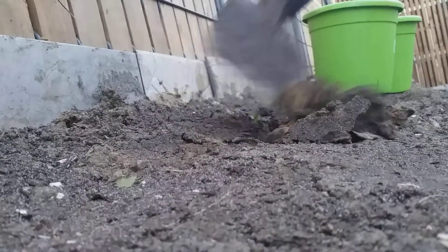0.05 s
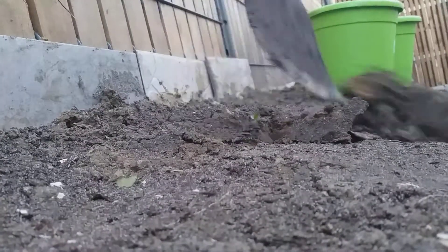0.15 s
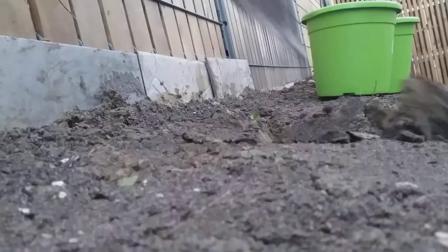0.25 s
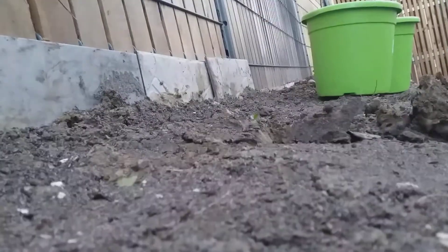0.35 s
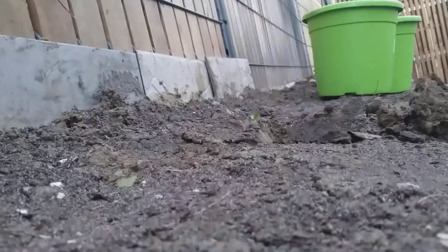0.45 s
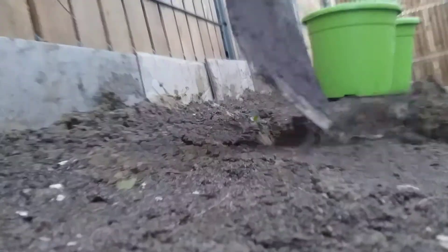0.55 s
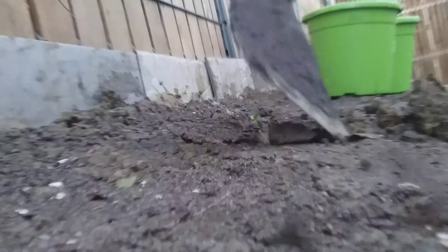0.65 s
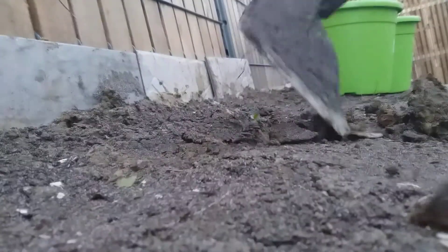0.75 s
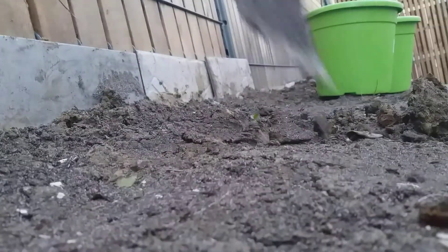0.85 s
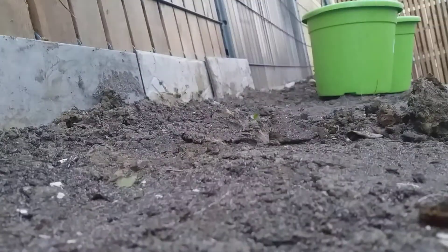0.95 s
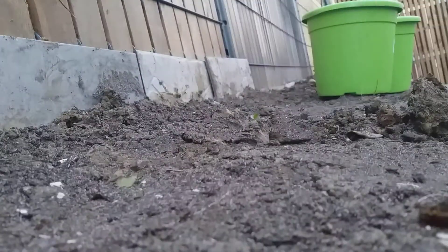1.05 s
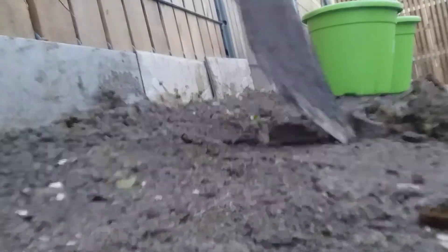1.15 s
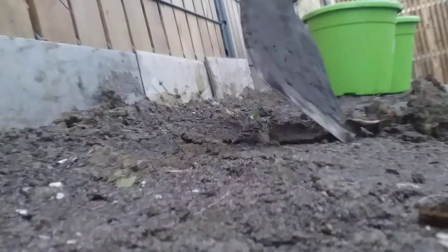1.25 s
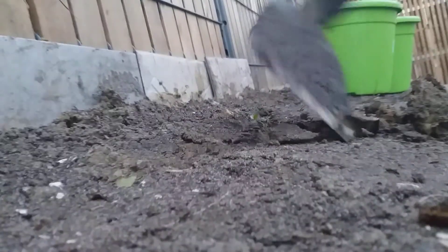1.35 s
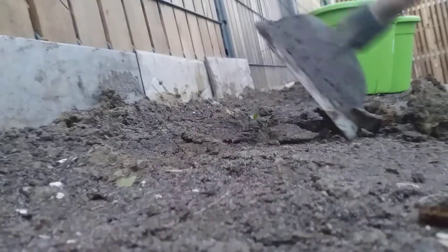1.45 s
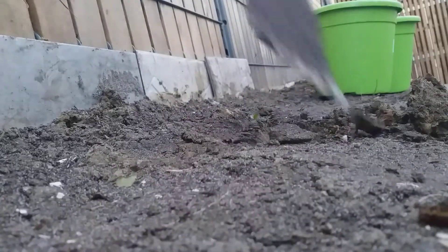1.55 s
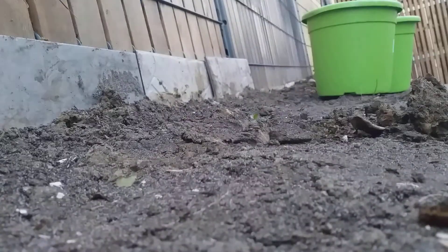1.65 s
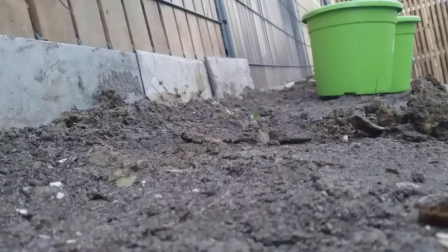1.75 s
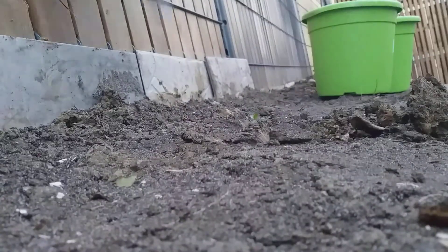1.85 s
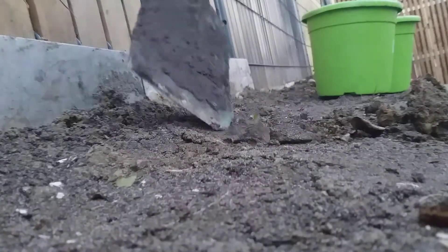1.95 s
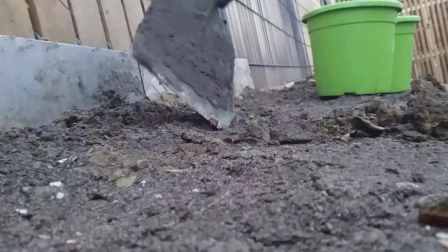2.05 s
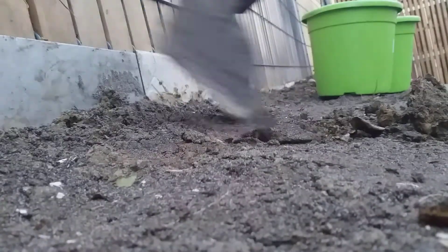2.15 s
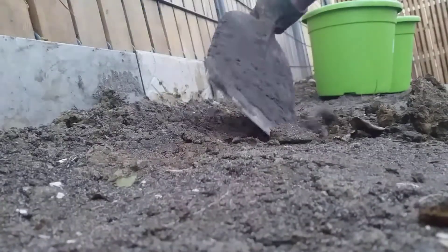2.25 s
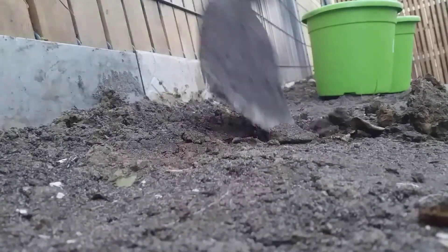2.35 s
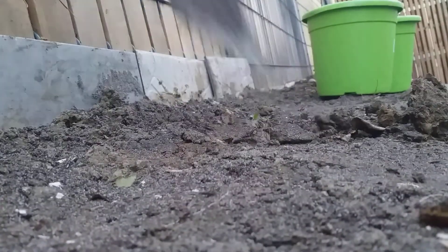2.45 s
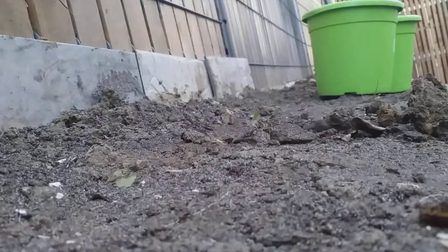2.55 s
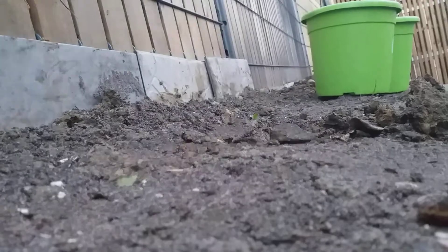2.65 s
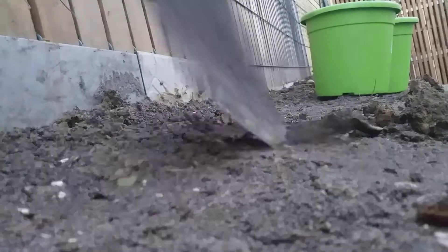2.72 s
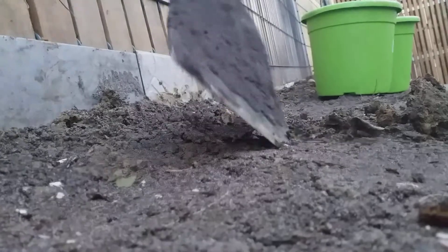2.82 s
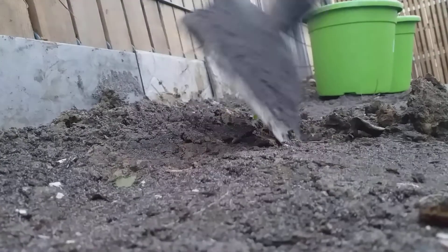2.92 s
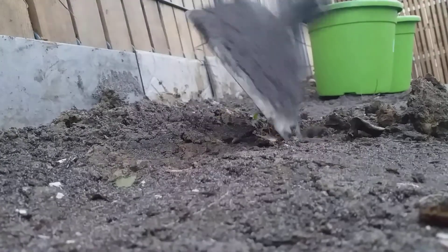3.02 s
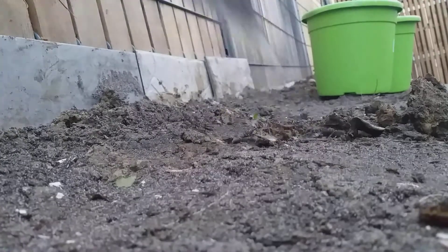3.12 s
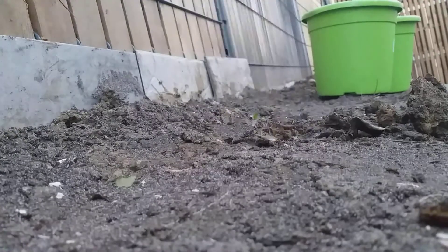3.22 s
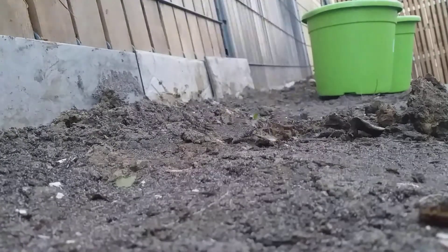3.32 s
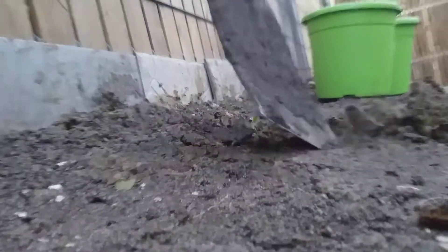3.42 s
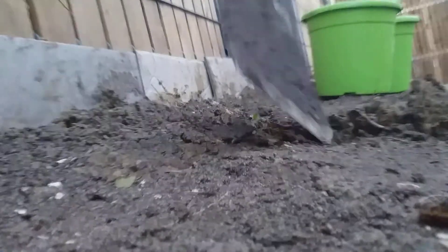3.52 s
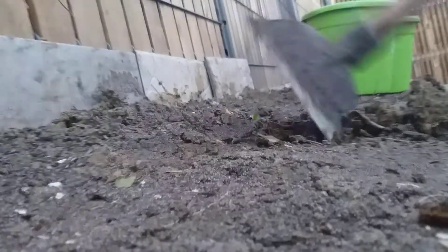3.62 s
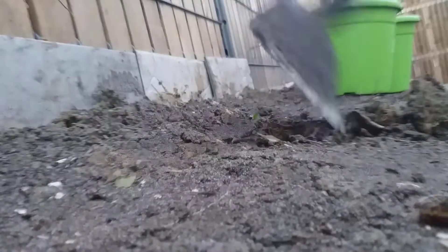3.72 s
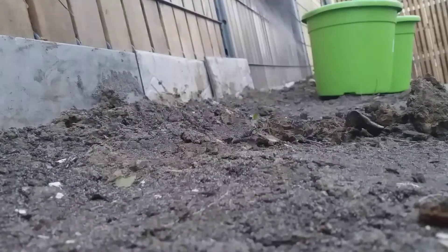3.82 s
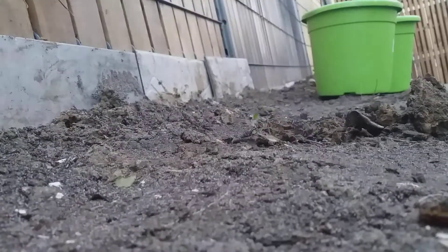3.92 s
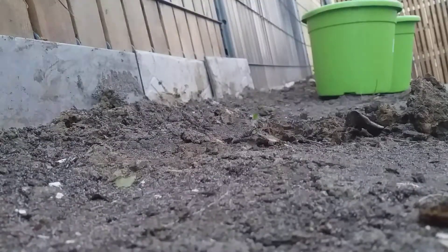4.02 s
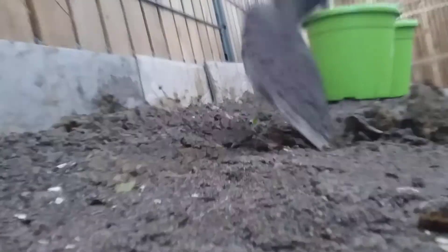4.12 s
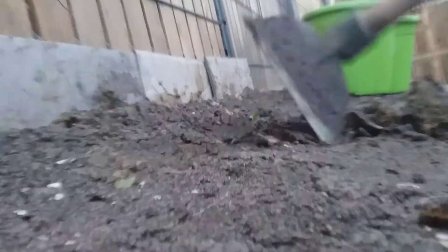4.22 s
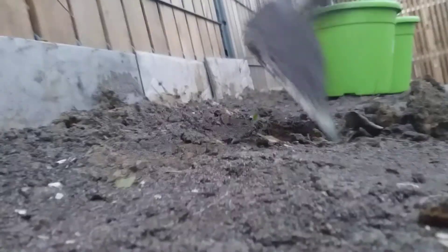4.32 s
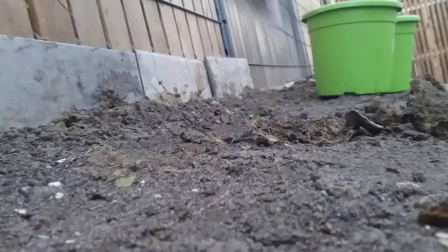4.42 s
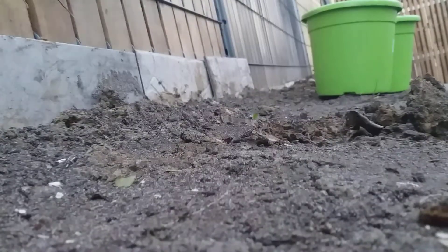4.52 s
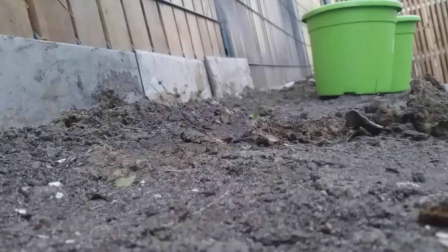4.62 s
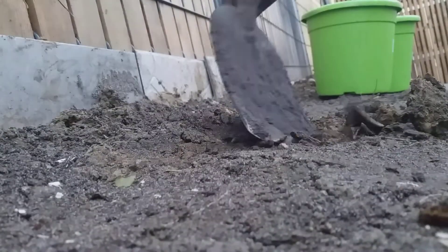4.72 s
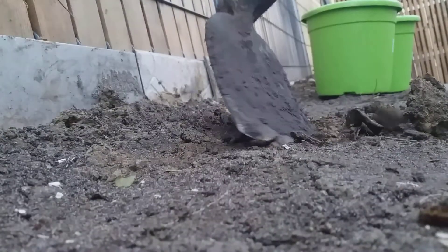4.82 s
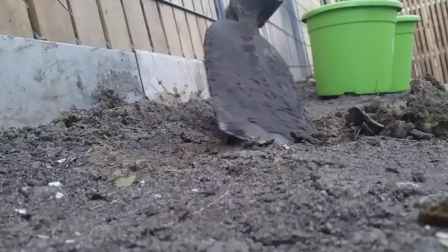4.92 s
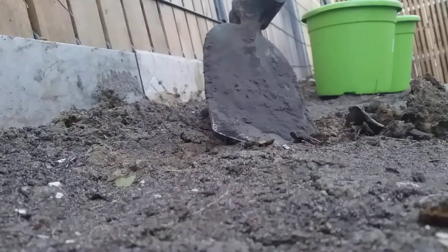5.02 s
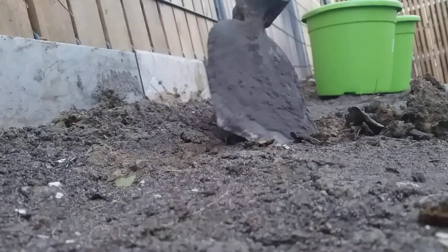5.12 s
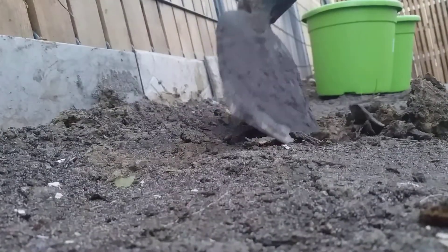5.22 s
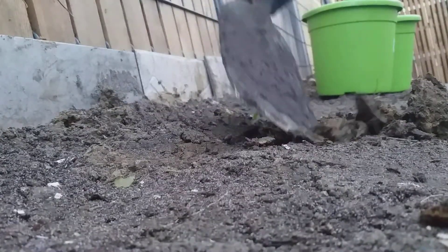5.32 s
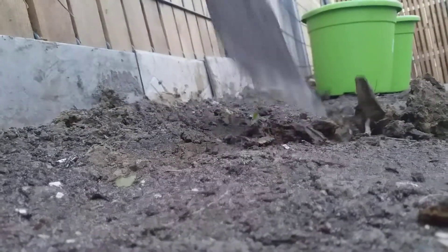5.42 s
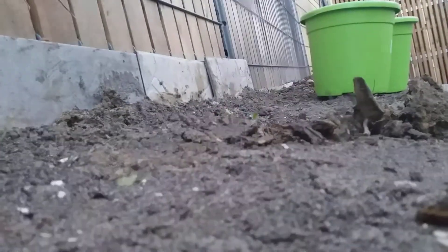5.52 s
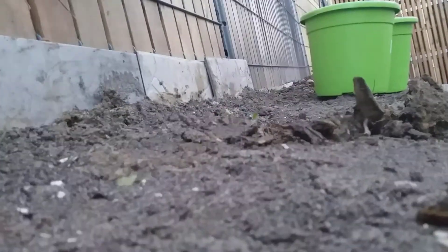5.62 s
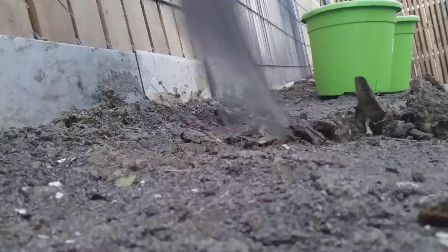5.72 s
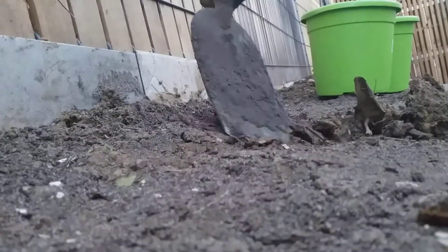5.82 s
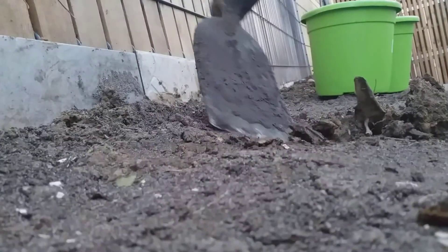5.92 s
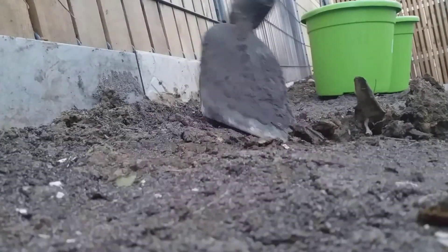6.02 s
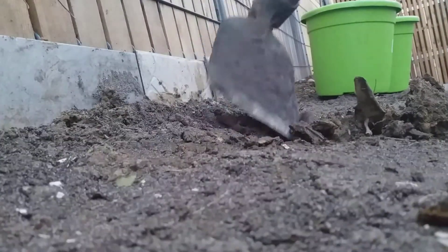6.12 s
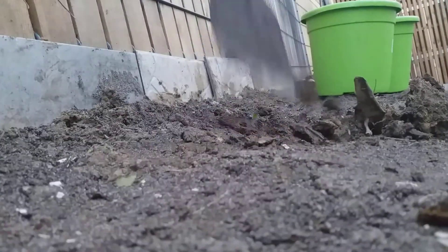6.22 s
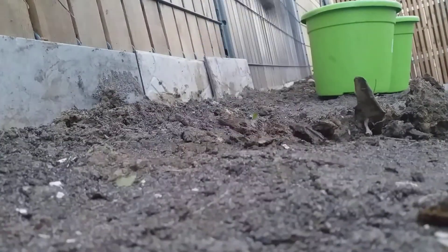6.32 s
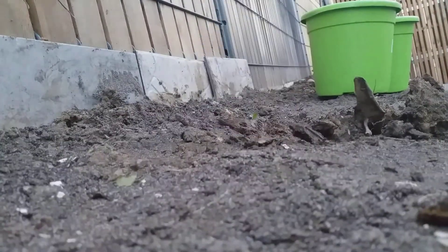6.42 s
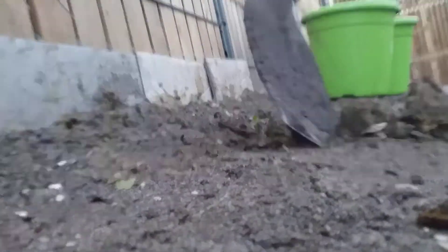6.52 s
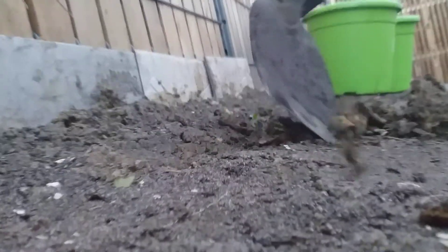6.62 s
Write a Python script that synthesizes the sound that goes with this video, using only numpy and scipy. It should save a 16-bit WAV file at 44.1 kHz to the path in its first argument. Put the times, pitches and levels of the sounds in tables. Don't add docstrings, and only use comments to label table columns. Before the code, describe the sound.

A steel hoe chops stony packed soil close by, each blow a sharp gritty crack over a dull earthy thud, with scrapes and falling crumbs between.

```python
import sys
import numpy as np
from scipy import signal
from scipy.fft import rfft, irfft
from scipy.io import wavfile
from scipy.ndimage import uniform_filter1d

SR = 44100
rng = np.random.default_rng(int(sys.argv[2]) if len(sys.argv) > 2 else 0)


def level_to_linear(level):
    exponent = np.asarray(level, float) / 20
    return 10 ** exponent


def store_pcm(level_fs):
    pcm = np.round(np.clip(level_fs, -1, 1) * 32767).astype(np.int16)
    wavfile.write(sys.argv[1], SR, np.atleast_2d(pcm).T)


N = 293706
T = np.arange(N) / SR

# time_s, level_db
TRAFFIC = [(0, -73), (.4, -77), (.7, -67), (1.7, -72.5), (2.1, -68.5), (2.7, -56.5), (3.3, -57.5),
           (3.8, -65.5), (4.3, -61), (4.6, -76), (5.3, -70.5), (5.7, -71), (6, -72.5), (6.45, -72.5),
           (6.66, -58.5)]
# frequency_hz, density_db_per_hz
TOWN_SPECTRUM = [(18, -38), (30, -17.5), (91, -2), (180, -5), (367, -6.5), (453, -2), (606, -5.5),
                 (656, -5.5), (729, -6.5), (1690, -19.5), (6170, -17), (8240, -37.5), (16400, -24)]

# frequency_hz, density_db_per_hz
GRIT_SPECTRUM = [(150, -41), (900, -21), (1750, -18), (2500, -9), (3600, -7), (4500, -5), (5500, -5),
                 (6350, -4.5), (6850, 0.5), (7560, -10.5), (8400, -23.5), (9500, -25), (11200, -20.5),
                 (15800, -20)]
# peak_s, level_db, brightest_hz
PEBBLES = [
    (.0695, -43.5, 3070),
    (.7079, -41.5, 2160),
    (.8803, -55, 2090),
    (.9184, -49.5, 6900),
    (.9712, -54.5, 3714),
    (1.012, -57.5, 6900),
    (1.1145, -47.5, 3300),
    (2.53, -48, 4270),
    (5.9525, -38.5, 2645),
    (.266, -54, 6500),
]
# peak_s, level_db, brightest_hz, rise_ms, fall_ms
SKIDS = [(.0945, -39.5, 4480, 2.1, 12.6), (2.3522, -28, 6000, 6.2, 3.1), (2.3614, -30.5, 3400, 3.3, 3.2),
         (2.8741, -29.5, 6630, 5, 4), (2.9037, -30, 4450, 0.6, 5.1), (3.0176, -29, 5630, 4.8, 7.9),
         (3.0248, -22.5, 7400, 19, 6.4), (4.6744, -4.5, 6490, 1.2, 5.7), (4.9078, -22, 5930, 2.1, 3),
         (4.9139, -18, 6200, 1.7, 2), (5.0317, -33.5, 3560, 0.74, 2.25), (5.3126, -33, 5550, 1, 6.1),
         (5.3275, -32, 5360, 1.5, 3), (5.3615, -27, 5660, 3, 3), (5.3748, -23, 5000, 6, 6.8),
         (5.387, -22.5, 6600, 1.8, 1.7), (5.3992, -31.5, 4560, 4.6, 2.9), (5.9011, -30.5, 4400, 1.3, 5.6),
         (6.169, -22.5, 6060, 4.7, 7.5)]
# peak_s, level_db, brightest_hz, rise_ms, fall_ms
BITES = [(.1035, -24.5, 5800, 2, 2.3), (.544, -16.5, 4300, 2.6, 2.7), (1.1587, -6.5, 6300, 1.01, 1.64),
         (1.9121, -23, 6100, 1.08, 5.9), (2.2069, -22, 7160, 0.32, 5.7), (2.8182, -16.5, 6520, 0.28, 1.5),
         (4.0925, -3.5, 6340, 1.4, 3.5), (5.7477, -6, 6380, 1.5, 6.16), (6.512, -20.5, 6120, 2.43, 4.2),
         (6.5151, -9.5, 6400, 0.99, 6.9)]
# peak_s, level_db, brightest_hz, spread_ms
GRINDS = [(0.1391, -44.5, 5650, 4.3), (1.2404, -37, 5510, 3.8), (1.279, -38.5, 6200, 4.6),
          (1.4334, -44.5, 4130, 6.7), (1.5256, -46, 2500, 5), (2.1299, -46, 5760, 5),
          (2.8944, -38.5, 6110, 4.8), (2.9416, -39.5, 5980, 8.1), (3.0501, -29.5, 5800, 11),
          (3.0688, -31, 3940, 5.1), (3.4749, -26, 6300, 6.6), (3.4997, -31.5, 6000, 3.5),
          (3.539, -33, 4630, 4.6), (3.621, -37.5, 4440, 9.8), (4.275, -32, 5530, 5.8),
          (4.3299, -37.5, 6200, 3.7), (4.7302, -39, 6500, 10.5), (4.7507, -40.5, 6950, 5),
          (6.603, -31, 5930, 2.9), (6.6157, -32.5, 6200, 2.5)]
# peak_s, level_db, brightest_hz, rise_ms, fall_ms
BURIALS = [(.5504, -7, 3800, 1.74, 2.5), (1.168, -7.5, 5440, 3, 2.9), (1.9205, -26.5, 5200, 2.1, 4.33),
           (2.7325, -24, 4500, 0.92, 2), (2.7375, -11, 6550, 1.5, 2.2), (2.7415, -10.5, 6390, 2.5, 4),
           (3.42, -4, 6530, 2.44, 4.3), (3.4351, -22.5, 4470, 1.5, 3.3), (3.4419, -11, 4250, 2.3, 2.2),
           (3.513, -20, 6550, 2.6, 3.7), (4.6835, -13, 5590, 2.3, 3.1), (6.5234, -5, 4130, 1.5, 2.4)]
# peak_s, level_db, brightest_hz, fall_ms
SCORES = [(1.9, -40, 5800, 4), (1.9, -42, 5800, 5.8), (1.951, -39, 5300, 3.4), (2.2675, -42, 3500, 7.1),
          (2.3445, -37, 3620, 4.8), (2.8635, -39.5, 6100, 2), (2.9385, -38.5, 6100, 5.3),
          (2.956, -41.5, 4600, 8.1), (3.0905, -45, 10400, 2.7), (5.300, -46, 5300, 5),
          (5.3225, -40, 5400, 3), (5.8, -37, 5500, 3.6), (5.3715, -24, 6200, 2), (1.9425, -38.5, 3500, 5.6),
          (1.9165, -25, 5400, 1.7), (2.8075, -41, 4500, 2), (5.2, -35.5, 6460, 6), (4.1875, -42, 6600, 6),
          (4.7, -36, 7200, 5), (5.262, -47, 3500, 6.4), (6.565, -33, 5500, 3), (1.2095, -38, 5460, 3),
          (.569, -35, 4600, 3), (.6225, -40, 5200, 3)]
# peak_s, level_db, brightest_hz
SNAPS = [(2.1203, -35, 3600), (2.7814, -29.5, 4450), (2.8365, -42, 6500), (2.8807, -28, 4840),
         (3.4934, -30, 6330), (4.8245, -36.5, 5720), (4.8388, -28, 6400), (4.847, -36, 4990),
         (4.8525, -34.5, 6580), (4.8822, -27.5, 6460), (5.0116, -37, 5900), (5.05, -50, 5160),
         (5.1425, -47, 3840), (5.3063, -42, 5430), (5.8082, -28.5, 5100), (5.8773, -32, 4400),
         (6.189, -24.5, 4800), (6.5421, -32, 2960), (6.6247, -29.5, 8100)]
SNAP_RISE_MS, SNAP_FALL_MS, PEBBLE_RISE_MS, PEBBLE_FALL_MS = 0.67, 2.8, 0.79, 2.4
BITE_DULL_DB, BURIAL_DULL_DB, SKID_DULL_DB, SCORE_DULL_DB = -20, -13.5, -36.5, -26.5
GRIND_DULL_DB, SNAP_DULL_DB, PEBBLE_DULL_DB = -16.5, -20, -11
AIR_DB, AIR_PER_DB, AIR_AT_DB = -7, .15, -25

# peak_s, level_db, swell_db_per_s, fade_db_per_s
TUGS = [
    (0.097, -52.5, 91, 83),
    (1.525, -53.5, 98, 801),
    (2.144, -49.5, 125, 700),
    (2.19, -54, 100, 500),
    (2.351, -42, 600, 410),
    (3.046, -42.5, 168, 219),
    (3.919, -50, 632, 132),
    (5.25, -55, 85.5, 200),
    (5.381, -45.5, 314, 281),
    (6.183, -41, 204, 505),
]
# start_s, length_s, level_db, fade_db_per_s
POURS = [(0.55, .15, -38.5, 142), (0.664, .09, -52.5, 16), (0.745, 0.06, -50, -30), (0.84, .3, -67.5, 44),
         (1.177, .3, -41, 73), (1.926, .03, -46, 20), (1.96, .16, -53, 100), (2.209, 0.027, -42, 60),
         (1.493, .033, -54, 0), (2.26, 0.018, -50.5, 40), (2.392, 0.51, -64, 37.5), (2.756, .26, -48, 12.5),
         (3.1, 0.29, -64.5, 20.5), (3.432, .14, -30, 114), (3.568, 0.14, -47.5, 9),
         (4.097, 0.076, -48.5, -83.5), (4.182, 0.12, -40.5, 53), (4.357, .25, -66.5, 134),
         (4.701, .12, -50, 29), (4.799, .125, -57, -108), (4.92, .1, -47, 40), (5.03, .1, -62, 50),
         (5.467, 0.39, -71, 39.5), (5.753, 0.11, -46, 31), (5.87, 0.047, -44.5, 0), (5.887, .18, -46, 84),
         (6.214, .3, -56, 163), (6.538, .15, -38.5, 102)]
POUR_START_DB_S, POUR_STOP_DB_S, STILL_DB = 1701, 376, -88
CRACKLE_PER_S, CRACKLE_MS, CRACKLE_DB = 30, .9, -15
PATCH_DB = 3.6
FINE_FLICKER_DB, FINE_TILT, FINE_AT_DB = 2, 0.071, -51

# frequency_hz, level_db, t60_s
BLADE = [(520, -6, .08), (785, -4, .08), (1165, -8, .06), (1464, -6, .17), (1540, -2, .06), (2406, 0, .13),
         (2960, -12, .05), (3214, 0, .11), (3625, -6, .06), (4425, -5, .05), (4980, -12, .04),
         (5400, -13, .04), (6120, -3, .06), (6465, -6, .035), (6900, -15, .035), (7490, -18, .05)]
# frequency_hz, width_hz, level_db
SHEEN = [(8490, 46, -4.5), (9520, 160, -7), (10730, 73, -4), (11650, 74, -2.5), (12600, 130, -2.5),
         (13500, 72, -1), (13600, 97, 0.5), (14400, 130, -5), (15300, 69, -3.5), (15800, 120, -3.5)]
SHEEN_T60_S, SHEEN_DB, SHEEN_GRIPPED_DB = .016, 5, -20.5
BURIED_T60_SHARE, BURIED_DB, LOW_BURIED_DB = 0.24, -12, -16
GRIPPED_DB, RUBBED_DB, THIN_DB = -31.5, -23, 3
# release_s, main_mode_db, low_modes_db, middle_modes_db, upper_modes_gain_db
JERKS = [(.145, -50, -49, -50, -4.5), (1.525, -39, -46, -71.5, -11), (2.21, -48, -63, -54, -8),
         (4.276, -45, -63.5, -64, -8.5), (5.328, -50, -61, -58.5, -14), (2.133, -54, -51.5, -56.5, -5),
         (2.365, -47.5, -45, -37.5, -10.5), (3.068, -35, -40, -43, 0), (5.4, -50.5, -51, -47, -6.5),
         (6.19, -52, -52, -50, -8), (6.172, -43, -45, -54, -6.5)]
# release_s, main_mode_db, low_modes_db, middle_modes_db, upper_modes_gain_db
EASINGS = [
    (0.808, -56, -58, -76, -8),
    (3.715, -44.5, -52.5, -68.5, -14.5),
    (4.326, -46.5, -53.5, -48, -10.5),
]
JERK_S, EASE_S, RUB_DB = .02, .095, -7

# start_s, peak_db, pitch_hz, length_s, handle_knock_db
THUDS = [(0.101, -51, 113, 0.057, -37.5), (.546, -15.5, 110, 0.022, -25.5),
         (1.164, -20.5, 105, 0.041, -25.5), (1.513, -78, 123.8, 0.041, -44.5),
         (1.917, -33.5, 121, 0.033, -36), (2.204, -41, 118, 0.037, -44), (2.738, -23.5, 109, 0.041, -19),
         (3.026, -60, 98.3, 0.033, -40), (3.419, -11, 80.3, 0.049, -16), (3.435, -25.5, 68, 0.044, -15.5),
         (4.089, -23.5, 110.5, 0.04, -26), (4.67, -28, 117, 0.034, -38), (5.365, -68, 124, .04, -62),
         (5.748, -35.5, 94.5, 0.045, -47.5), (6.182, -54, 116, 0.061, -43), (6.518, -28, 87.7, 0.049, -21)]
THUD_LAG_S, THUD_RISE_S, SHUDDER_DB, SHUDDER_T60_S = .006, .004, -15, .14
# frequency_hz, level_db, t60_s
HANDLE = [(247, -1, 0.11), (525, 0.5, 0.015), (743.7, 5, 0.088)]
# start_s, level_db, pitch_hz, t60_s, pot_ring_db
CLODS = [(0.548, -17, 1120, 0.022, -90), (.695, -21, 870, 0.003, -63), (.707, -25, 850, 0.0083, -82),
         (.826, -28, 410, 0.0074, -83), (.87, -48, 1510, 0.011, -71), (.949, -43, 1520, 0.015, -57.5),
         (1.113, -39, 1490, 0.013, -48), (5.2, -47.5, 551, 0.18, -73), (5.25, -55, 527, 0.16, -65),
         (5.515, -52, 559, 0.18, -75), (5.555, -49, 453, 0.12, -68.5)]
# frequency_hz, level_db, t60_s
POT = [(546, 1.5, 0.22), (760, -9, 0.076), (1120, -8, 0.041), (1945, -11.5, 0.05), (3800, -16, 0.037)]
# time_s, level_db
SCUFF = [
    (3.84, -89),
    (3.86, -52),
    (3.925, -40.5),
    (3.95, -49.5),
    (4.0, -43.5),
    (4.05, -57),
    (4.08, -68),
]
FENCE_T60_S, FENCE_DB = 0.021, -24


def curve(table):
    s, *columns = np.transpose(table)
    return [np.interp(T, s, c) for c in columns]


def unit(x):
    return x / np.sqrt(np.mean(x ** 2))


def band(x, lo_hz, hi_hz, order=2):
    return signal.sosfilt(signal.butter(order, [lo_hz, hi_hz], "band", fs=SR, output="sos"), x)


def colour(x, points):
    hz, db = np.transpose(points)
    grid_hz = np.arange(1025) * SR / 2048
    log_gain = np.interp(np.log(grid_hz + 1), np.log(hz), db) * np.log(10) / 20
    cepstrum = irfft(log_gain)
    cepstrum[1:1024] *= 2
    cepstrum[1025:] = 0
    response = irfft(np.exp(rfft(cepstrum)))
    return signal.fftconvolve(x, response)[:len(x)]


def modes(x, table, t60_share=1):
    out = 0
    for hz, db, t60 in table:
        r = np.exp(-np.log(1000) / (t60 * t60_share * SR))
        pole = r * np.exp(2j * np.pi * hz / SR)
        out = out + level_to_linear(db) * np.sqrt(1 - r * r) * signal.lfilter([1], [1, -pole], x).imag
    return out


def walk(rate):
    k = int(SR / rate)
    held = np.repeat(rng.standard_normal(N // k + 1), k)
    return 1.2 * uniform_filter1d(uniform_filter1d(held, k), k)[:N]


def grains(shape, share, spread_db):
    u = rng.random((3,) + shape)
    size = level_to_linear(-spread_db * np.log(1 - .97 * u[2]))
    return unit((u[0] < share) * np.sign(u[1] - .5) * size)


def add(bus, s, x):
    i = max(int(s * SR), 0)
    bus[i:i + len(x)] += x[:N - i]


def town():
    noise = colour(rng.standard_normal(N), TOWN_SPECTRUM)
    noise /= np.std(band(noise, 150, 1200))
    swell = band(noise, 52, 1200) * level_to_linear(curve(TRAFFIC)[0] + 1.3 * walk(6))
    still = colour(rng.standard_normal(N), TOWN_SPECTRUM)
    return swell + level_to_linear(-74.0 + 1.0 * walk(4.1)) * unit(still)


def stones():
    rows = [r + (BITE_DULL_DB,) for r in BITES]
    rows += [r + (BURIAL_DULL_DB,) for r in BURIALS]
    rows += [r + (SKID_DULL_DB,) for r in SKIDS]
    rows += [r[:3] + (SNAP_RISE_MS / 2, r[3], SCORE_DULL_DB) for r in SCORES]
    rows += [r + (r[-1], GRIND_DULL_DB) for r in GRINDS]
    rows += [r + (SNAP_RISE_MS, SNAP_FALL_MS, SNAP_DULL_DB) for r in SNAPS]
    return rows + [r + (PEBBLE_RISE_MS, PEBBLE_FALL_MS, PEBBLE_DULL_DB) for r in PEBBLES]


def cracks():
    ms = np.arange(-512, 2560) / SR * 1000
    rows = stones()
    chips = colour(grains((len(rows) * len(ms),), .2, 2.5), GRIT_SPECTRUM).reshape(len(rows), -1)
    lumps = unit(band(rng.standard_normal(chips.shape), 220, 2200))
    sharp, dull = np.zeros((2, N))
    for (s, db, hz, rise_ms, fall_ms, dull_db), chip, lump in zip(rows, chips, lumps):
        swell = (np.abs(ms) / rise_ms) ** 1.8
        decay = (np.abs(ms) / fall_ms) ** 1.31
        shape = level_to_linear(-8 * np.where(ms < 0, swell, decay))
        tone = unit(chip) + 1.3 * unit(band(chip, .84 * hz, 1.14 * hz, order=1))
        tone = tone + level_to_linear(AIR_DB - AIR_PER_DB * (db - AIR_AT_DB)) * band(tone, 8000, 20000)
        burst = shape * tone / np.sqrt(np.sum((shape * tone) ** 2) / np.sum(shape ** 2))
        start_s = s + ms[0] / 1000
        add(sharp, start_s, burst * level_to_linear(db))
        add(dull, start_s, shape ** 0.54 * lump * level_to_linear(db + dull_db))
    return sharp, dull


def drag():
    db = np.full(N, 1. * STILL_DB)
    for s, length, top_db, fade in POURS:
        late = T - s
        run = top_db - fade * np.clip(late, 0, length) - POUR_STOP_DB_S * np.maximum(late - length, 0)
        db = np.maximum(db, run + POUR_START_DB_S * np.minimum(late, 0))
    for s, top_db, swell, fade in TUGS:
        db = np.maximum(db, top_db - np.where(T < s, swell, fade) * np.abs(T - s))
    u = rng.random((2, N))
    lumps = (u[0] < CRACKLE_PER_S / SR) * level_to_linear(CRACKLE_DB - 4 * np.log(1 - .95 * u[1]))
    bursts = signal.lfilter([1], [1, -np.exp(-1000 / (CRACKLE_MS * SR))], lumps)
    return level_to_linear(db) * (1 + bursts)


def patchy(x, depth_db):
    edges = 600 * 2 ** np.arange(0, 4.9, .25)
    return x + sum((level_to_linear(depth_db * walk(70)) - 1) * band(x, lo, hi) for lo, hi in zip(edges, edges[1:]))


def sliding_soil(flow):
    crumbs = grains((N,), .03, 3.0) + .6 * rng.standard_normal(N)
    slide = flow * unit(patchy(colour(crumbs, GRIT_SPECTRUM), PATCH_DB))
    fine = level_to_linear(FINE_FLICKER_DB * walk(160)) * (level_to_linear(FINE_AT_DB) / flow) ** FINE_TILT
    return slide + (fine - 1) * band(slide, 6600, 18000)


def releases():
    return [row + (JERK_S,) for row in JERKS] + [row + (EASE_S,) for row in EASINGS]


def freedom(column):
    gain = 0
    for row in releases():
        loosening = np.maximum(np.exp(-np.abs(row[0] - T) / row[5]) - .1, 0)
        gain = gain + level_to_linear(row[column]) * (row[0] > T) * loosening
    return gain


def ring():
    out = 0
    for column, group in ((1, BLADE[5:6]), (2, BLADE[:5]), (3, BLADE[6:9])):
        drive = level_to_linear(RUB_DB) * freedom(column) * grains((N,), .01, 6.5)
        for row in releases():
            add(drive, row[0], level_to_linear(row[column] + 22) * np.hanning(4))
        out = out + modes(drive, group)
    return out


def hoe():
    sharp, dull = cracks()
    flow = drag() * level_to_linear(2.2 * walk(45) + 2.2 * walk(200))
    slide = sliding_soil(flow)
    bare = freedom(4)
    edge = sharp + slide
    thin = band(edge, 7400, 14000)
    sheen_modes = [(hz, db, SHEEN_T60_S) for hz, _, db in SHEEN]
    sheen = modes(thin * (bare + level_to_linear(SHEEN_GRIPPED_DB)), sheen_modes)
    edge = edge + level_to_linear(THIN_DB) * bare * thin + level_to_linear(SHEEN_DB) * sheen
    shear = dull + level_to_linear(-10.0) * flow * unit(band(rng.standard_normal(N), 92, 1700))
    buried = level_to_linear(BURIED_DB) * modes(edge, BLADE[9:], BURIED_T60_SHARE)
    buried = buried + level_to_linear(LOW_BURIED_DB) * modes(sharp, BLADE[2:7] + BLADE[8:9], BURIED_T60_SHARE)
    held = edge * level_to_linear(GRIPPED_DB) + slide * level_to_linear(RUBBED_DB)
    singing = modes(edge * bare + held, BLADE[8:]) + modes(held, BLADE[4:6])
    return edge + shear + buried + singing + ring()


def earth():
    t = np.arange(9000) / SR
    out, knock = np.zeros((2, N))
    chips = rng.standard_normal((len(THUDS), len(t)))
    for (s, db, hz, length, knock_db), chip in zip(THUDS, chips):
        glide_hz = hz * (.85 + .25 * np.exp(-t / .02))
        wave = np.sin(2 * np.pi * np.cumsum(glide_hz) / SR) * level_to_linear(-60 * (t / length) ** 2)
        shudder = level_to_linear(SHUDDER_DB - 60 * t / SHUDDER_T60_S) * unit(band(chip, 50, 150))
        rise = 1 - np.exp(-t / THUD_RISE_S)
        add(out, s + THUD_LAG_S, level_to_linear(db + 3.5) * rise * (wave + shudder))
        add(knock, s, level_to_linear(knock_db - 5.5) * chip * np.exp(-t / .007))
    return out + modes(knock, HANDLE) + level_to_linear(11.0) * band(knock, 86, 1100)


def clods():
    t = np.arange(6000) / SR
    out, taps = np.zeros((2, N))
    chips = rng.standard_normal((len(CLODS), len(t)))
    for (s, db, hz, t60, pot_db), chip in zip(CLODS, chips):
        plop = .7 * np.sin(2 * np.pi * hz * t) + .7 * unit(band(chip, .7 * hz, 1.4 * hz))
        rise = 1 - np.exp(-t / t60 / 0.086)
        add(out, s, level_to_linear(db - 60 * t / t60) * rise * plop)
        add(taps, s, level_to_linear(pot_db + 32.5) * np.ones(1))
    return out + modes(taps, POT)


def boot():
    inside = (T > SCUFF[0][0]) & (T < SCUFF[-1][0])
    level = level_to_linear(curve(SCUFF)[0] + 1.5 * walk(36))
    return inside * level * unit(band(rng.standard_normal(N), 163.4, 536, order=3))


def scene():
    near = hoe() + earth() + clods() + boot()
    t = np.arange(8000) / SR
    fence = unit(rng.standard_normal(len(t)) * (t > .003) * level_to_linear(-60 * t / FENCE_T60_S)) / np.sqrt(len(t))
    echo = signal.fftconvolve(near, fence)[:N]
    return (near + level_to_linear(FENCE_DB) * echo + town())[None]


def low_pass(x):
    return signal.sosfilt(signal.butter(12, 16510, fs=SR, output="sos"), x)


def record(dry):
    bass_cut = signal.butter(3, 35, "high", fs=SR, output="sos")
    top_cut = signal.ellip(8, .2, 70, 16000, fs=SR, output="sos")
    rounded = np.tanh(0.71 * signal.sosfilt(bass_cut, dry)) / 0.89
    return low_pass(signal.sosfilt(top_cut, rounded))


dry = scene()
out = record(dry)
store_pcm(out)
```